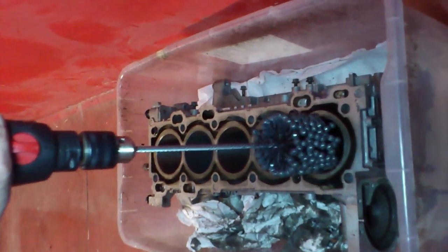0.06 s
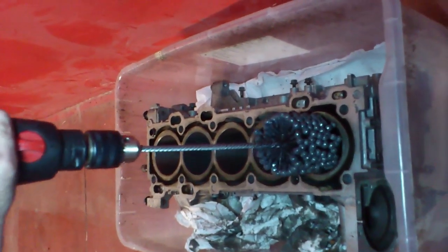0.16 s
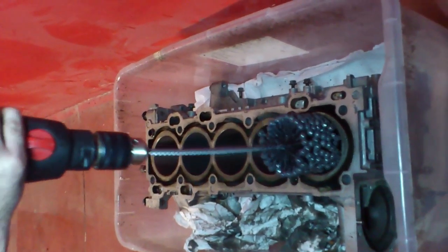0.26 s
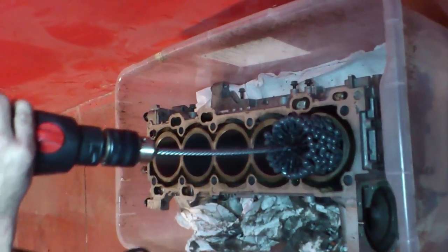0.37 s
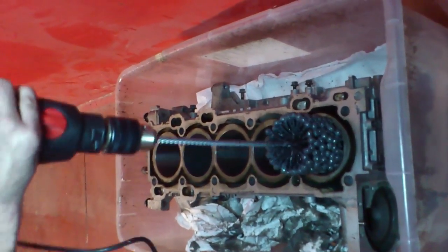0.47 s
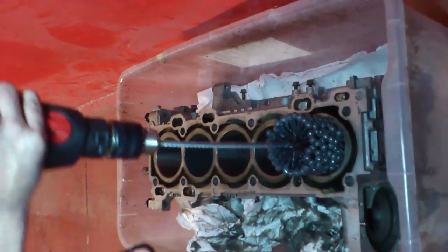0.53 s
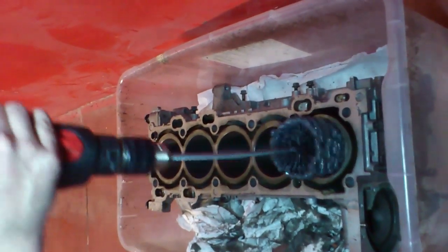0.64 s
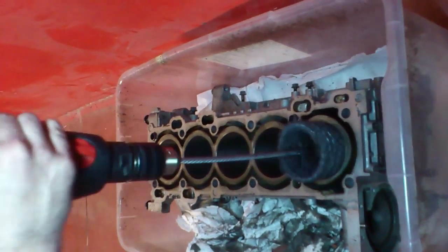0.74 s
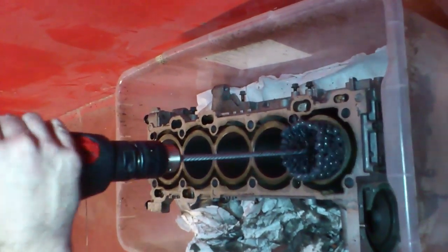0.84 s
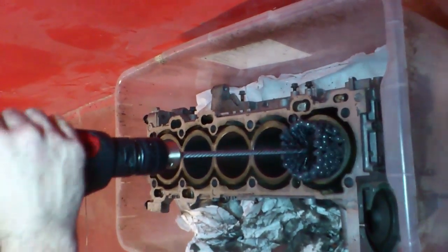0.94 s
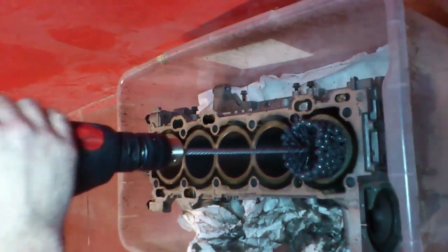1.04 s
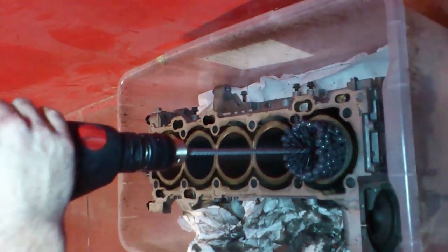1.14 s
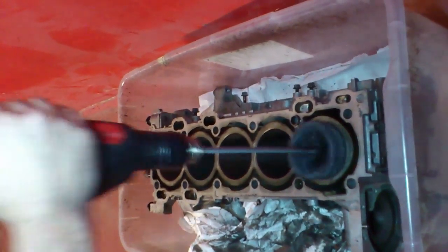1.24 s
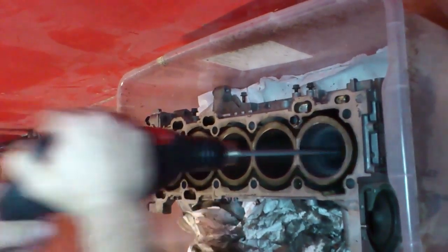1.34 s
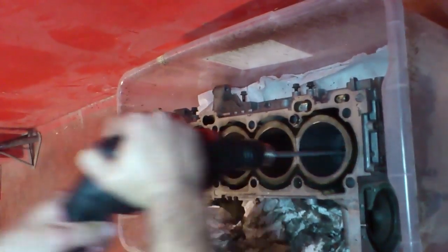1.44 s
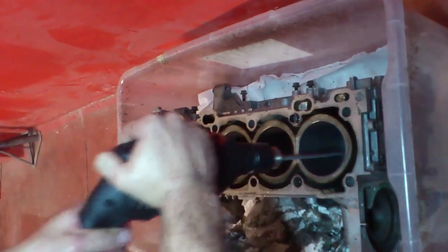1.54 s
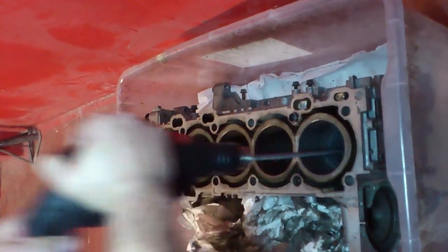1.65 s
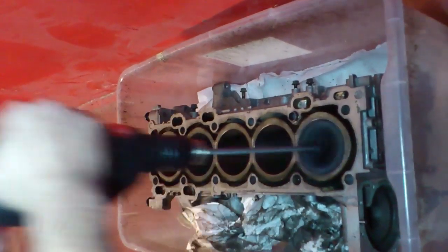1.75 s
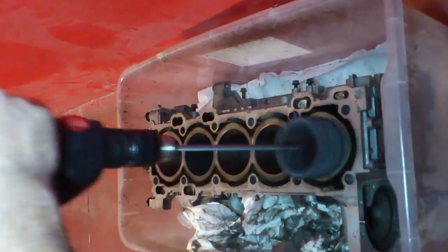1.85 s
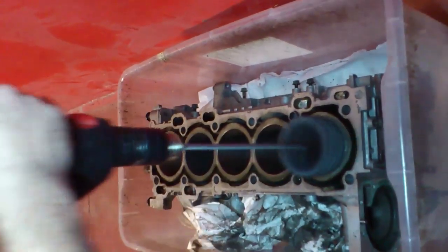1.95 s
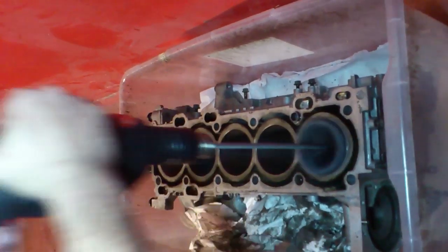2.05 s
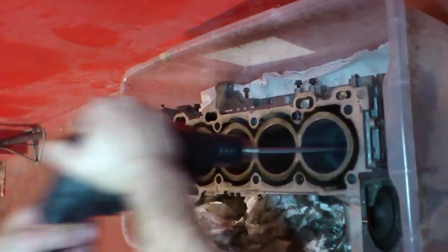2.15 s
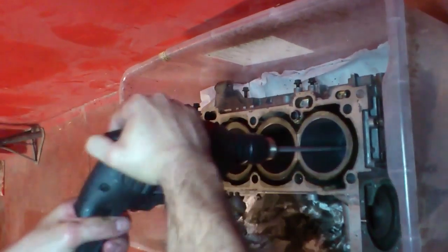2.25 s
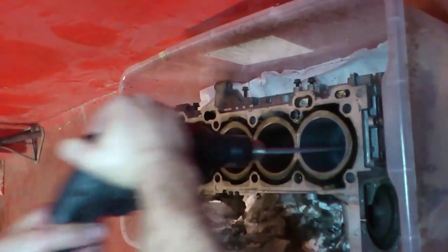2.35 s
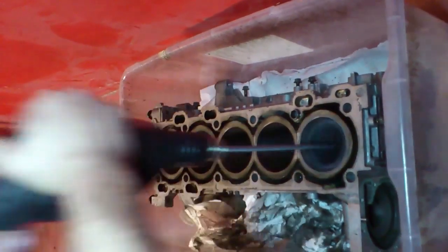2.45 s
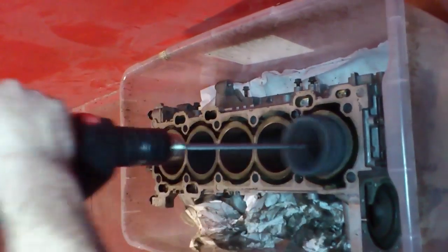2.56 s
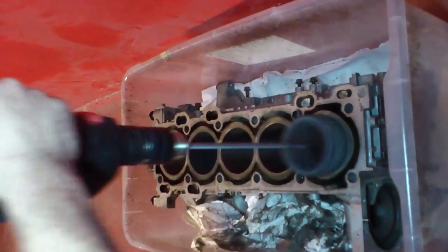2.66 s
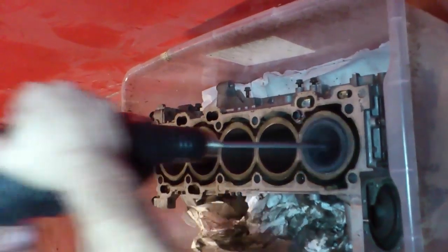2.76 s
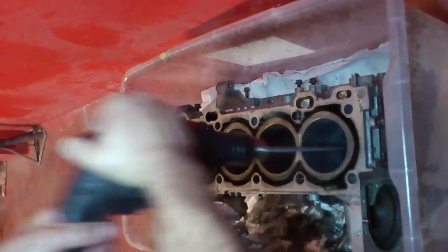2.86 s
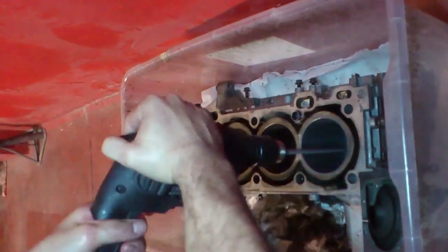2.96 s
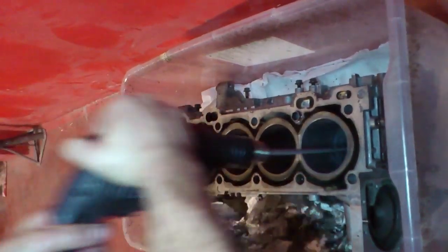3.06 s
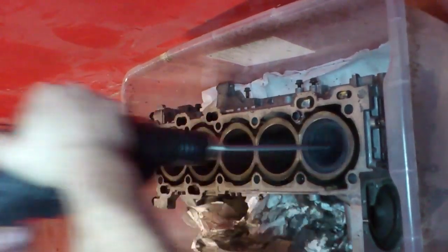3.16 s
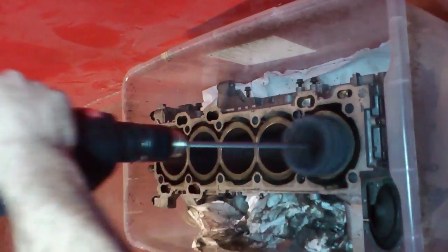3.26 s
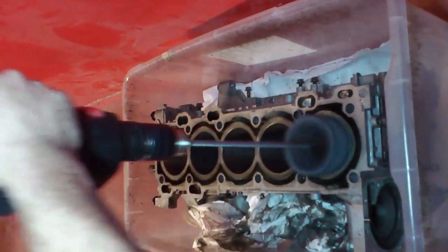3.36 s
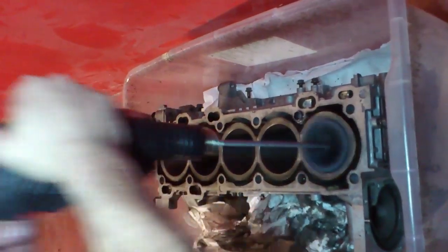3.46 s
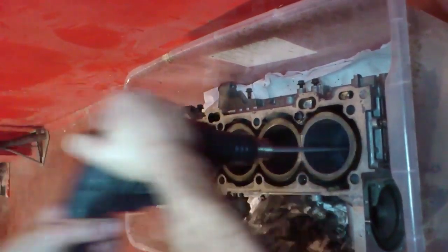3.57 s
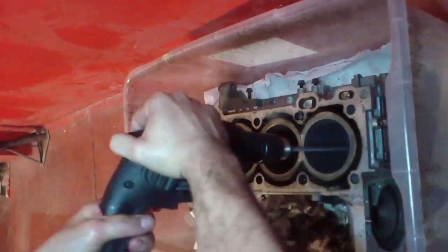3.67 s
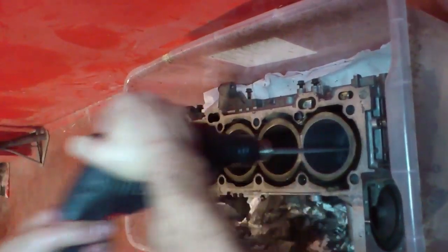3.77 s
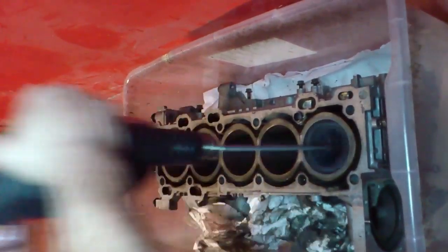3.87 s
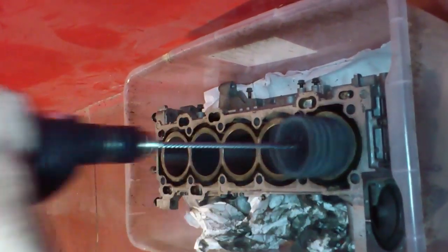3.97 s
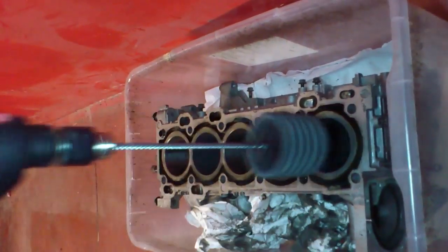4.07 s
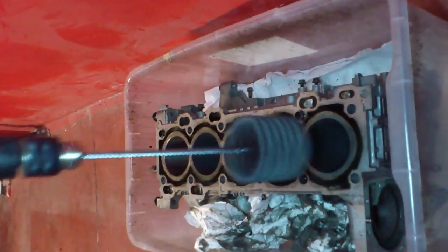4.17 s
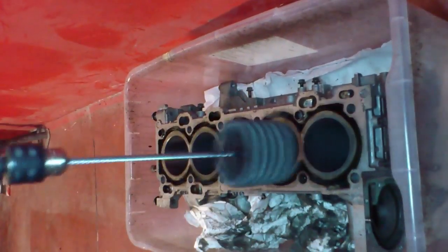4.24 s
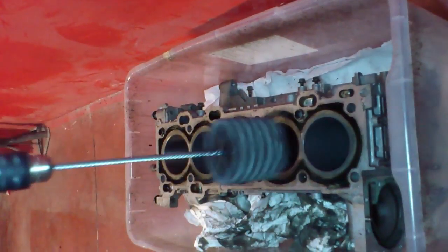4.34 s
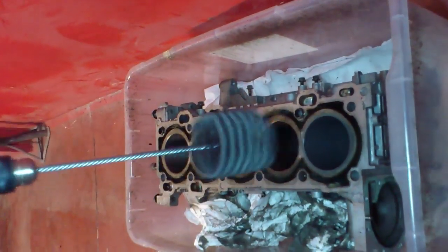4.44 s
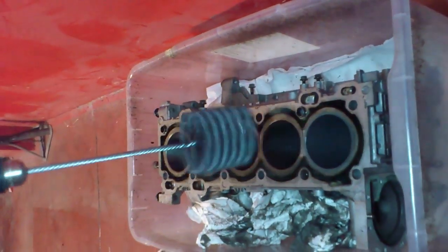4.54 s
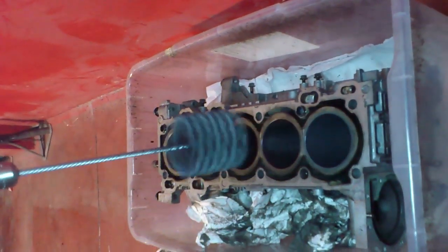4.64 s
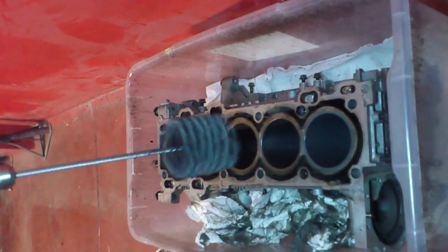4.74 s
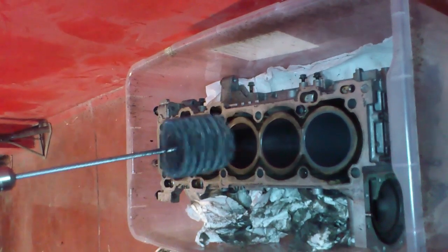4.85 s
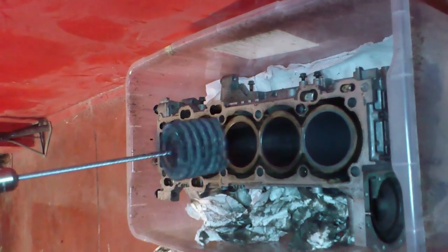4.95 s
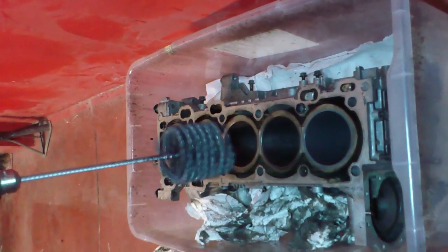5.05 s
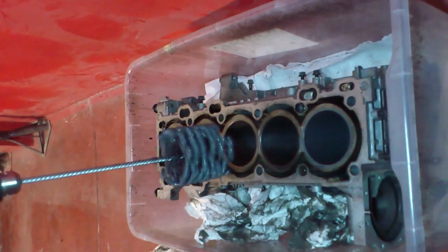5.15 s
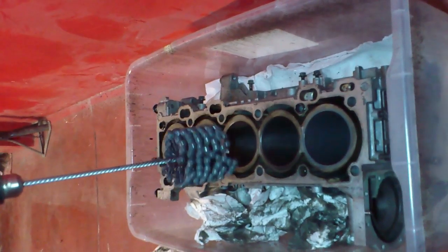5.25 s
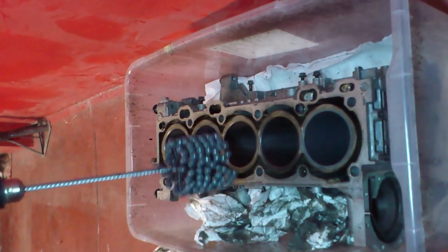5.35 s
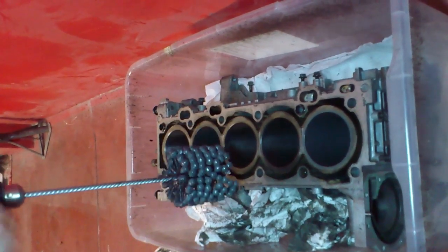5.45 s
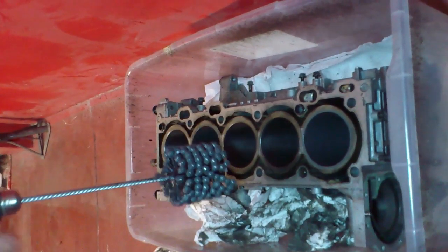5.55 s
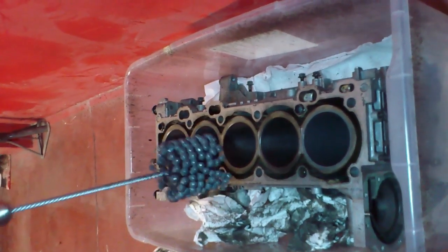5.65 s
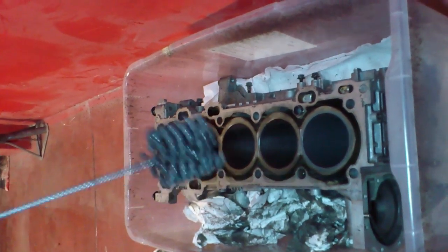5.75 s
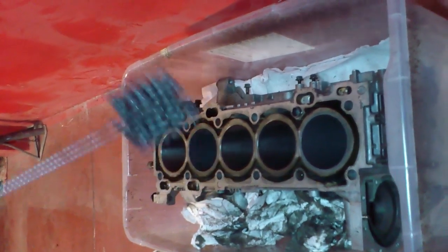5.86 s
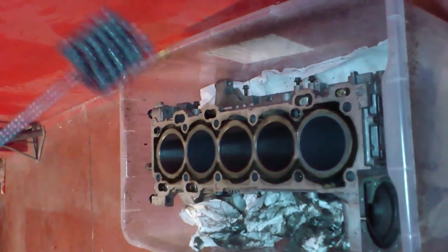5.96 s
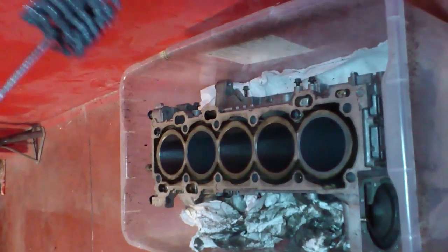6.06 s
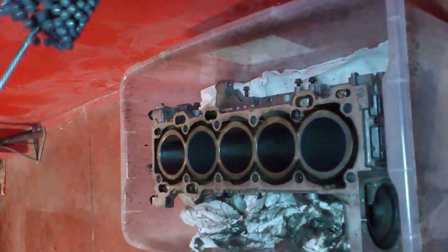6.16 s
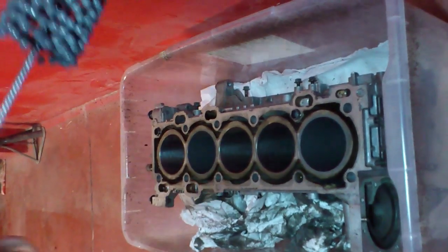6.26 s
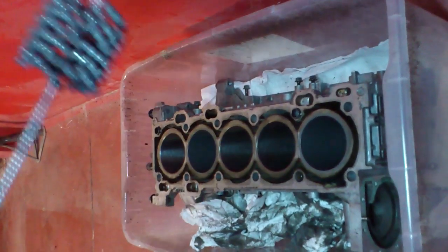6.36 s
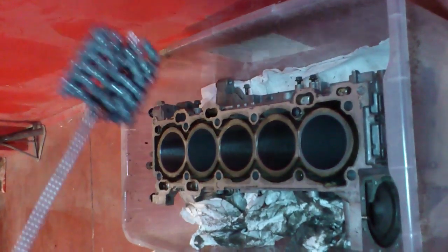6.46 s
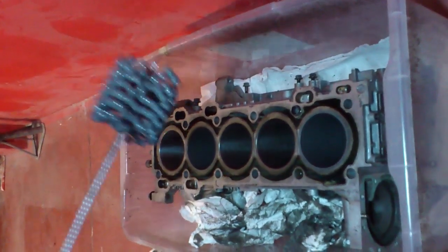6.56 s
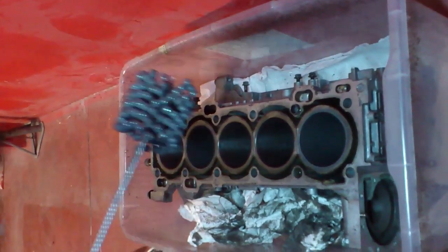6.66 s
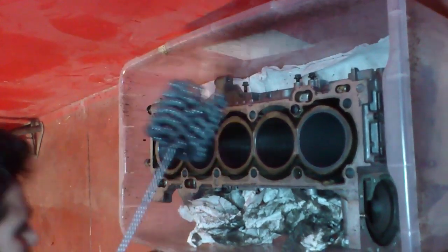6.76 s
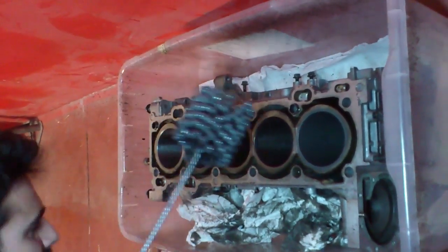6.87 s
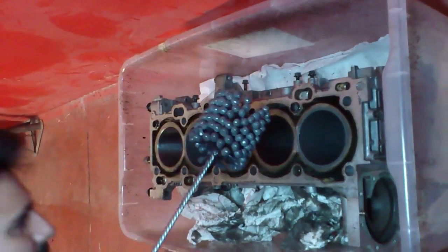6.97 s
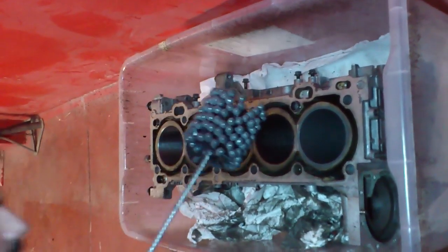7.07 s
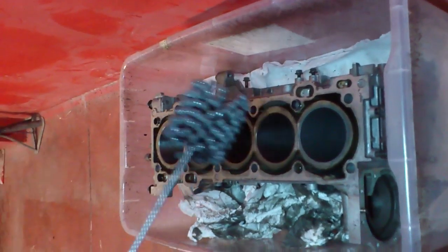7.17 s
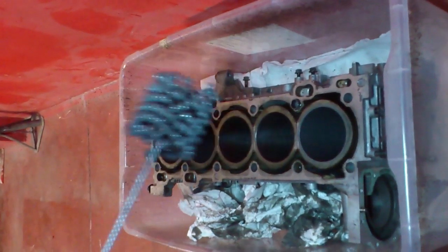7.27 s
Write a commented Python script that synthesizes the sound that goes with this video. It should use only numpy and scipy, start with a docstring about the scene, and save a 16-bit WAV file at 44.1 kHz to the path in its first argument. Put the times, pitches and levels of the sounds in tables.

```python
"""An electric drill spins a ball hone in an engine block that stands in a plastic tub, over a workshop's hum.
Ticks and sleeve swishes (shaped noise) lead to a short nudge of the trigger, heard as hiss and a faint growl.
The motor spins up and the hone is stroked up and down the bore: beaded noise with a delayed copy scrapes,
sines tied to the motor speed whine and sag with each plunge, and loud peaks flatten at the close microphone.
Pulled out, the drill coasts to a stop with hiss, hum and rattle; small ticks and swishes follow."""
import sys
import numpy as np
from scipy import signal
from scipy.fft import rfft, irfft, next_fast_len
from scipy.io import wavfile
from scipy.ndimage import uniform_filter1d

SR = 44100
rng = np.random.default_rng(int(sys.argv[2]) if len(sys.argv) > 2 else 0)


def put_to_file(sound):
    """Save the sound as 16-bit audio at rate SR, in the file named by the first command-line argument."""
    columns = np.atleast_2d(sound).T  # one column per channel
    safe = np.clip(columns, -1, 1)
    whole_steps = np.round(safe * 32767)
    wavfile.write(sys.argv[1], SR, whole_steps.astype(np.int16))


N = 322371
TIME, FREQ = np.arange(N) / SR, np.fft.rfftfreq(next_fast_len(N), 1 / SR) + 1e-3

# Strokes of the hone, each from the top of the bore down and back. Each row: start in seconds, extra motor
# speed on the plunge in rev/s before spin-up, then offsets in dB: scrape on the plunge, scrape on the pull,
# rumble, whine.
STROKES = [(1.33, 0, 0, 4, 6, 0), (2.02, 0.5, -0.5, 1, -3, 0), (2.745, -5, -1, 0, -3.5, -2),
           (3.445, 4, -1.5, -2, 0, -1.5)]
LAST_TOP_S = 4.13  # the last stroke ends here, clear of the bore


def from_db(db):
    """Decibels to gain."""
    return 10 ** (np.asarray(db) / 20)


def rms_one(x):
    """Scale to unit power."""
    return x / np.sqrt(np.mean(x ** 2) + 1e-20)


def at_hz(points):
    """Read a table of (Hz, value) on a log-frequency axis."""
    hz, value = np.transpose(points)
    return np.interp(np.log(FREQ), np.log(hz), value)


def filtered(x, response):
    """Apply a frequency response."""
    size = next_fast_len(N)
    return irfft(rfft(x, size) * response, size)[..., :N]


def pan(db):
    """Left and right gains; positive dB leans left."""
    return from_db(np.array([[.5], [-.5]]) * db)


def drift(rate):
    """Smooth random wander of rms 1, with `rate` new values per second."""
    knots = rng.standard_normal(N // 100)
    return rms_one(np.interp(TIME * rate, np.arange(len(knots)), knots))


def swell(s, rise_s, hold_s, fall_s):
    """Attack, hold and release as a gain, full from s on; rise and fall times are for 20 dB."""
    early = np.maximum(s - TIME, 0)
    late = np.maximum(TIME - s - hold_s, 0)
    distance = early / max(rise_s, 1e-3) + late / max(fall_s, 1e-3)
    return from_db(-20 * np.minimum(distance, 10))


def noise(colour, peaks=(), lag_ms=.15):
    """Coloured noise at two microphone ports, partly alike, the alike part later on the right; rms 1."""
    # Tilt between the ports. Each row: frequency in Hz, left over right in dB.
    balance = [(100, 0), (400, 0.3), (800, 0), (1800, 0), (2800, 0.5), (4200, 0.6), (6200, 0), (8000, 5),
               (9500, 10), (12500, 7), (15000, 2.5)]
    # How much the ports share. Each row: frequency in Hz, likeness from 0 to 1.
    likeness = [(60, 1), (300, 0.91), (800, 0.83), (2500, 0.29), (6000, 0.32), (15000, 0.26)]
    level_db = at_hz(colour)
    for hz, width, db in peaks:
        level_db = level_db + db / (1 + (2 * (FREQ - hz) / width) ** 2)

    # random peaks and dips colour the middle of the range, drawn separately for each channel
    knots = np.arange(0, SR / 2, 55)
    ripple = np.array([np.interp(FREQ, knots, row) for row in rng.standard_normal((2, len(knots)))])
    ripple_db = 3.0 * ripple / (1 + 2 * np.log2(FREQ / 3200) ** 2)
    low_cut = np.minimum(FREQ / colour[0][0], 1) ** 2
    shape = from_db(level_db + ripple_db) * pan(at_hz(balance)) * low_cut

    alike = np.clip(at_hz(likeness), 0, 1)
    lag_s = np.array([[-.5], [.5]]) * lag_ms / 1000
    late = np.exp(-2j * np.pi * np.minimum(FREQ, 10500) * lag_s)
    shared = filtered(rng.standard_normal(N), shape * late * np.sqrt(alike))
    separate = filtered(rng.standard_normal((2, N)), shape * np.sqrt(1 - alike))
    return rms_one(shared + separate)


def grains(per_s, decay_s):
    """Envelope of equal contacts at random moments, each dying fast; rms 1."""
    hits = 1.0 * (rng.random(N) < per_s / SR)
    power = signal.lfilter([1], [1, -np.exp(-2 / (decay_s * SR))], hits + 1e-18)
    return rms_one(np.sqrt(power))


def strokes_done():
    """Number of strokes made so far, with the fraction of the current one."""
    tops = [row[0] for row in STROKES] + [LAST_TOP_S]
    return np.interp(TIME, tops, np.arange(len(tops)))


def each_stroke(rows):
    """Repeat the columns of a one-stroke shape over all strokes."""
    share, *columns = np.transpose(rows)
    return [np.interp(strokes_done(), share, column, period=1) for column in columns]


def spun_up():
    """Share of full speed reached: the motor closes in exponentially once the trigger is pulled."""
    trigger_s, spin_up_s = 1.25, .13
    return 1 - np.exp(-np.maximum(TIME - trigger_s, 0) / spin_up_s)


def motor_speed():
    """Revolutions per second: spin up, sag with every plunge, then brake by friction and fan drag."""
    # The motor is dragged down as the hone goes deep. Each row: share of the stroke, speed in rev/s
    # before spin-up and plunge offsets.
    load_sag = [(0, 300), (.09, 289), (.222, 261), (.375, 242.5), (.545, 227), (.685, 238), (.805, 246),
                (.91, 283)]
    done, extra = strokes_done(), np.transpose(STROKES)[1]
    stroke = np.minimum(done.astype(int), len(extra) - 1)
    plunge = np.maximum(np.sin(2 * np.pi * done), 0) * extra[stroke]
    driven = (each_stroke(load_sag)[0] + plunge) * spun_up()
    # friction brakes steadily; at drag_speed (rev/s) the fan drag equals it
    stop_s, brake_rev_per_s2, drag_speed = 5.35, 190, 410
    free = drag_speed * np.tan(np.clip((stop_s - TIME) * brake_rev_per_s2 / drag_speed, 0, 1))
    return np.minimum(driven, free)


def run_down():
    """Gain of the coasting drill: it dies away, and shrinks to nothing with the speed below 38 rev/s."""
    return swell(4.1, .02, 0, 1.15) * np.minimum(motor_speed() / 38, 1)


def nudged():
    """Gain of the short first turn of the drill, after which the chuck runs on faintly."""
    nudge = swell(0.785, 0.17, 0.091, 0.096)
    run_on = from_db(-7) * swell(0.73, .06, 0.0091, 0.46)
    return np.maximum(nudge, run_on)


def honing():
    """Gains of scrape, rumble and whine: the common stroke, pressed a little differently each time."""
    # What every stroke sounds like. Each row: share of the stroke, then relative levels in dB: scrape,
    # rumble of the block, fan whine.
    stroke_sound = [(.08, -1, -41, -8.5), (.22, -4.5, -42.5, -7.5), (.33, 1, -31.5, -14.5),
                    (.46, 0.5, -25.5, -25), (.56, 0, -36.5, -25.5), (.68, -9, -44, -12.5),
                    (.8, -6, -48, -15), (.92, -10, -47.5, -15)]
    _, _, plunge_db, pull_db, rumble_db, whine_db = np.transpose(STROKES)
    halves = (np.arange(2 * len(STROKES)) + .5) / 2
    scrape_db = np.ravel([plunge_db, pull_db], "F")  # plunge and pull in turn
    own_db = [scrape_db, np.repeat(rumble_db, 2), np.repeat(whine_db, 2)]
    # the beads bite and later leave the bore
    bite_s, leave_s = 1.3225, 4.075
    in_bore = swell(bite_s, 0.042, leave_s - bite_s, 0.047)
    return [in_bore * from_db(common + np.interp(strokes_done(), halves, own))
            for common, own in zip(each_stroke(stroke_sound), own_db)]


def workshop():
    """Low room noise and a machine hum of sines that waver in level and phase."""
    # Hum tones. Each row: frequency in Hz, relative level in dB.
    hum_tones = [(62, -55.5), (80.7, -60), (301.5, -60.5), (446.8, -67.5), (732, -62), (1820, -68)]
    # Room noise. Each row: frequency in Hz, relative dB per Hz.
    room_colour = [(12, -65.5), (20, -24), (76, -5.5), (266, -20.5), (298, -14), (324, -22), (362, -20.5),
                   (667, -26), (725, -23), (1720, -35), (1870, -28.5), (2030, -37), (2450, -35.5),
                   (2850, -37), (3640, -41), (9930, -52), (15500, -64)]
    hum = 0
    for hz, db in hum_tones:
        level = from_db(db + 1.1 * drift(7.9)) * np.sqrt(2)
        hum = hum + level * np.sin(2 * np.pi * hz * TIME + 0.48 * drift(4.3))
    return hum * pan(0.3) + from_db(-42.5) * noise(room_colour, lag_ms=.01)


def cloth():
    """Sleeve and hand slide on the drill: a dull swish of friction noise with a finer rustle on top."""
    # Slides. Each row: start of the fall in seconds, bright rustle in relative dB, dull swish in
    # relative dB, rise in seconds, fall in seconds.
    slides = [(.36, -46, -57, 0.28, 0.42), (.49, -45.5, -51, 0.28, 0.17), (.625, -41, -38.5, 0.029, 0.15),
              (5.945, -58.5, -54, .1, 0.15), (6.05, -63, -68, .04, .06), (6.335, -41.5, -52, 0.04, .15),
              (6.4, -31.5, -29.5, 0.068, 0.078), (6.505, -42, -45, 0.17, 0.092),
              (6.6, -57.5, -57.5, 0.103, .3), (7.06, -46, -52.5, 0.21, 0.27), (7.24, -56, -60, .08, 0.14)]
    # Fine rustle, then dull swish. Each row: frequency in Hz, relative dB per Hz.
    rustle_colour = [(1500, -5), (3000, -11), (5000, 0.5), (9500, -3.5), (11500, -7), (13500, -11),
                     (16000, -22)]
    swish_colour = [(600, -18), (1200, -15), (1900, 2), (2900, 4), (4200, -2), (7000, -15)]
    power = 0
    for s, bright_db, dull_db, rise_s, fall_s in slides:
        power = power + (from_db([[bright_db], [dull_db]]) * swell(s, rise_s, 0, fall_s)) ** 2
    bright, dull = np.sqrt(power)
    rustle = from_db(3.0) * bright * noise(rustle_colour, lag_ms=0.036)
    return rustle + from_db(1.5) * dull * noise(swish_colour, lag_ms=0.052)


def ticks():
    """Each touch is a sharp crack of noise with a short, softer tail."""
    # Ticks of trigger, chuck and hone beads. Each row: start in seconds, relative level in dB,
    # change below 4 kHz in dB, left over right in dB.
    touches = [(0.146, -31.5, -6, -1), (0.188, -26, -3, 0), (0.2035, -23, -8, 3), (0.293, -24.5, -12, 4),
               (0.3822, -25, 6, 2), (0.4585, -17.5, -22, 7.5), (0.6754, -14.5, 2, 1),
               (0.8633, 4, -12, -1.5), (0.904, -15, -14, -1), (1.0012, -25, 5, -1), (1.018, -33.5, 16, -6),
               (1.0575, -32, 0, -1), (1.2473, -10, -5.5, 0), (1.2568, -9.5, 2, -6.5), (1.3053, 1, 1.5, -3),
               (4.4403, -18, -11, 7), (4.456, -26, -13, 7), (5.6007, -44.5, -4, -4), (5.7372, -39, -5, -3),
               (5.8017, -38, -11, -1), (6.1364, -47.5, -6, 0.0), (6.175, -40.5, -16, 8)]
    # Tick spectrum. Each row: frequency in Hz, relative dB per Hz.
    tick_colour = [(300, -23.5), (900, 0.5), (2000, -8), (5000, 5), (9000, 6), (12000, -3), (16000, -11)]
    sound = noise(tick_colour, lag_ms=0.047)
    low = filtered(sound, 1 / (1 + (FREQ / 4000) ** 4))
    out = np.zeros((2, N))
    for s, level_db, low_db, side_db in touches:
        start = max(int(s * SR), 0)
        span = slice(start, start + SR // 5)
        age = TIME[:len(TIME[span])]
        # crack, body and tail
        fade = .7 * np.exp(-age / .0004) + np.exp(-age / .004) + from_db(-18) * np.exp(-age / .016)
        toned = sound[:, span] + (from_db(low_db) - 1) * low[:, span]
        out[:, span] += from_db(level_db - 9.0) * fade * pan(side_db) * toned
    return out


def gearbox():
    """While speeding up, slack teeth knock and the gear case growls; coasting, it mostly hums."""
    # Growl of the case, then its one resonance while coasting. Each row: frequency in Hz, relative dB per Hz.
    growl_colour = [(300, -30), (560, -16.5), (740, -2), (850, -1), (1050, -13), (2000, -29)]
    gear_hum_colour = [(500, -24), (680, -9.5), (745, 1.5), (820, -7), (1000, -14.5), (2000, -34.5)]
    spin_up = swell(1.302, 0.016, 0.19, .12)
    level = from_db(-44.5) * nudged() + from_db(-24) * spin_up + from_db(-39) * run_down()
    growl = level * grains(per_s=170, decay_s=0.01) * noise(growl_colour, lag_ms=0.063)
    return growl + from_db(-44) * np.sqrt(run_down()) * noise(gear_hum_colour, lag_ms=.07)


def drill_air():
    """Air and brushes hiss through the housing; unloaded, the gears rattle and the hone sways on its shaft."""
    # Hiss of the nudge, then of the coasting drill. Each row: frequency in Hz, relative dB per Hz.
    nudge_colour = [(150, -40.5), (250, -9), (318, -17), (603, -7.5), (669, -19), (742, -1.5),
                    (1120, -18.5), (1460, -2.5), (1610, -10), (4960, 0), (8770, -3), (15500, -11.5)]
    air_colour = [(150, -35), (250, -8), (490, -6.5), (729, -13), (882, -10), (961, -10), (1070, -4),
                  (1890, -2), (2280, -3), (5130, 1), (6420, -4), (8770, -2), (11400, -9), (14000, -13),
                  (15500, -15)]
    # Housing resonances. Each row: frequency in Hz, width in Hz, boost in dB.
    housing = [(5300, 740, 0), (8450, 1400, 6), (13500, 960, 10.5)]
    sway_s, sways_per_s = 4.175, 17.6  # moment of one outward swing, and rate
    sway = from_db(2.0 * np.cos(2 * np.pi * sways_per_s * (TIME - sway_s)))
    rattle = rms_one(1.5 + grains(per_s=290, decay_s=0.0027))
    nudge = nudged() * noise(nudge_colour, lag_ms=0.028)
    coast = run_down() * sway * rattle * pan(0.36) * noise(air_colour, housing, lag_ms=0.17)
    return from_db(-23.5) * nudge + from_db(-21.5) * coast


def whine():
    """Fan blades and commutator bars sing at multiples of the motor speed; gear teeth join as load slows it."""
    # Motor tones. Each row: multiple of the motor speed, relative level under power in dB,
    # relative level coasting in dB, left over right in dB.
    motor_orders = [(3.94, -1, -9, -3.5), (7.94, 2, -15, -4), (12.08, -1.5, -39, 11), (16.12, 2, -32, -2),
                    (19.36, -2, -21, -10.5), (23.8, -8, -7.5, -12.5), (34.8, -4.5, -11, 14.5),
                    (44.6, -12.5, -19, 5.5)]
    # How well the drill body radiates a tone. Each row: frequency in Hz, gain in dB.
    radiation = [(500, -27.5), (720, -26), (830, -20.5), (930, -16), (1000, -25), (1180, -5.5), (1400, -13),
                 (1850, -4.5), (2400, -9.5), (2900, -1.5), (3250, -2.5), (3550, 4.5), (3900, -2),
                 (4400, -4.5), (4900, -6.5), (5600, -2), (6400, -10.5), (10000, -8.5)]
    speed = motor_speed()
    turns = np.cumsum(speed * (1 + .003 * drift(220))) / SR
    # the whine needs nearly full speed, and fades as the trigger is let go
    released = swell(0, 0, 4.02, 0.047)
    powered = honing()[2] * spun_up() ** 9 * released
    coasting = from_db(-25.5) * run_down() * np.clip(speed / 120, 0, 1) ** 4
    carried = from_db(at_hz(radiation))

    def line(order, side_db, loaded, free):
        """One tone with random level flutter, partly separate in each channel; less coloured when free."""
        flutter = from_db(2 * drift(28) + 3.2 * np.array([drift(90), drift(90)]) - 1.5)
        port_lead = np.array([[.5], [-.5]]) * speed * .00016  # 0.16 ms between the ports
        cycles = order * (turns + port_lead) + rng.random()
        colour = np.interp(order * speed, FREQ, carried)
        level = loaded * colour + free * np.sqrt(colour)
        return np.sin(2 * np.pi * cycles) * flutter * pan(side_db) * level

    slowing = uniform_filter1d(1. * (np.gradient(speed) < 0), size=3000)
    total = line(3.13, -1, powered * from_db(-3.5 + 9.7 * slowing), 0)  # gear teeth
    fan = powered * from_db(1 - 4 * slowing)
    for order, power_db, coast_db, side_db in motor_orders:
        total = total + line(order, side_db, fan * from_db(power_db), coasting * from_db(coast_db))
    return total


def moving_comb(x):
    """A delayed copy of the 2.4-4.6 kHz band, its lag varying with the stroke, makes moving peaks and notches."""
    top_ms, bottom_ms = 1.2, 2.9  # lag at the top and at the bottom of the stroke
    sunk = (1 - np.cos(2 * np.pi * strokes_done())) / 2
    lag_s = (top_ms + (bottom_ms - top_ms) * sunk) / 1000
    band_pass = signal.butter(2, (2400, 4600), "band", fs=SR, output="sos")
    band = signal.sosfilt(band_pass, x)
    return x + from_db(-5) * np.array([np.interp(TIME - lag_s, TIME, side) for side in band])


def hone():
    """Abrasive beads scour the bore and shake the block; a harder scrape takes on the deep bore's colour."""
    # Scrape of the beads, then rumble of the block. Each row: frequency in Hz, relative dB per Hz.
    scrape_colour = [(300, -27.5), (600, -17.5), (800, -17), (1450, -12.5), (2200, -9), (2700, -7),
                     (3500, -7.5), (4900, -1.5), (6000, -1), (7500, -2.5), (10200, -3.5), (11500, -5.5),
                     (15000, -8), (17000, -5)]
    rumble_colour = [(20, -6.5), (60, -6), (150, -3.5), (225, 7.5), (330, -3), (600, -3), (1500, -42.5)]
    # Peaks and notches of the cylinder with the hone at its mouth, then deep inside.
    # Each row: frequency in Hz, width in Hz, boost in dB.
    bore_mouth = [(797, 170, 6.5), (2200, 300, 0), (2520, 470, -4), (2950, 130, 3), (3970, 250, -3.5),
                  (4880, 360, 2), (10800, 1100, -0.5)]
    bore_deep = [(1910, 120, 3.5), (2804, 70, 4), (3450, 310, -1.5), (3880, 150, 7), (4050, 120, -1),
                 (6280, 620, 3.5), (9400, 530, 2.5), (10320, 450, 5)]
    scrape, rumble, _ = honing()
    depth = np.clip((20 * np.log10(scrape) + 7) / 6.5, 0, 1)
    mouth = np.sqrt(1 - depth) * noise(scrape_colour, bore_mouth, lag_ms=.15)
    deep = np.sqrt(depth) * noise(scrape_colour, bore_deep, lag_ms=0.1488)
    beads = grains(per_s=2600, decay_s=0.0024)
    scouring = from_db(0.92) * scrape * beads * moving_comb(mouth + deep)
    return scouring + from_db(-0.5) * rumble * noise(rumble_colour, lag_ms=0.086)


def scene():
    """All sources at the microphone; the workshop sinks slowly under the drill and comes back."""
    hum_dip_db = -3.5 * swell(4.37, 3.0, 0.6, 3.1)
    background = from_db(hum_dip_db) * workshop()
    return background + cloth() + ticks() + gearbox() + drill_air() + whine() + hone()


def record(dry):
    """The input overloads with flat tops, then the treble ends steeply at 15.85 kHz."""
    clipped = dry / (1 + (np.abs(dry) / .93) ** 8) ** (1 / 8)
    treble_end = 1 / (1 + (FREQ / 15850) ** 200)
    return np.clip(filtered(from_db(.3) * clipped, treble_end), -1, 1)


dry = scene()
out = record(dry)
put_to_file(out)
```